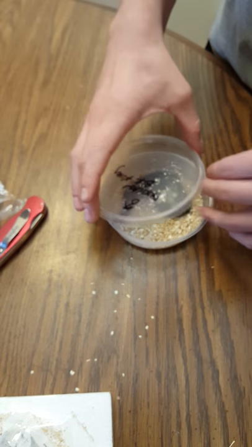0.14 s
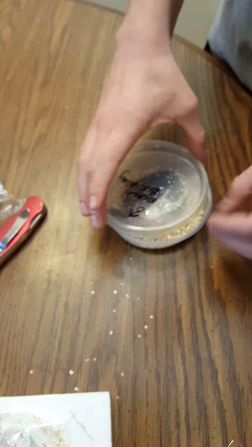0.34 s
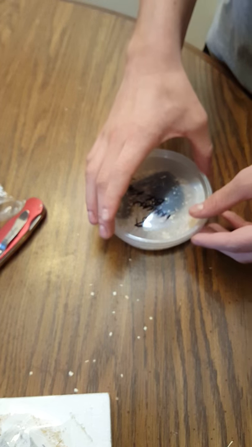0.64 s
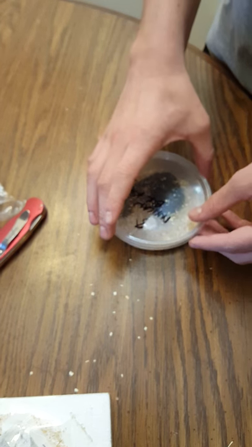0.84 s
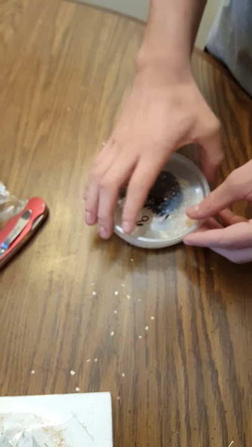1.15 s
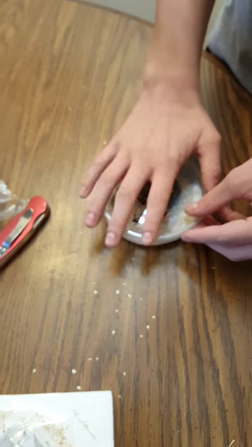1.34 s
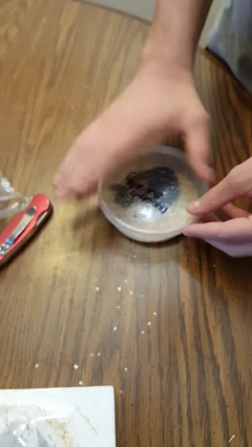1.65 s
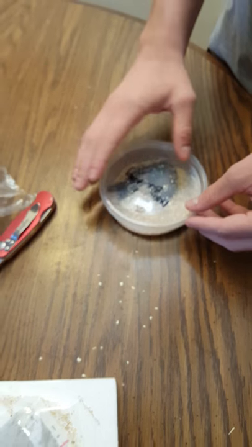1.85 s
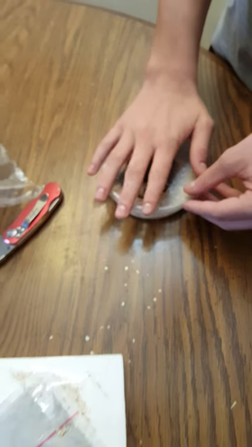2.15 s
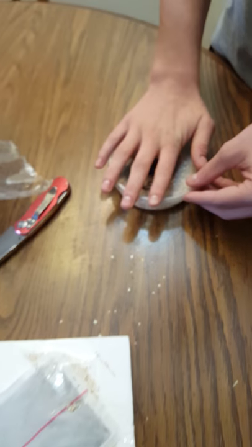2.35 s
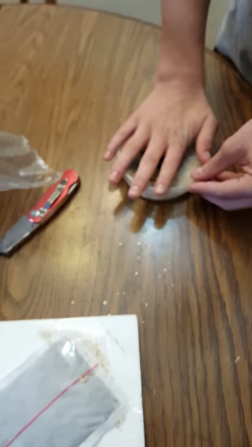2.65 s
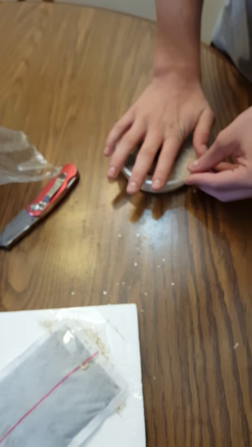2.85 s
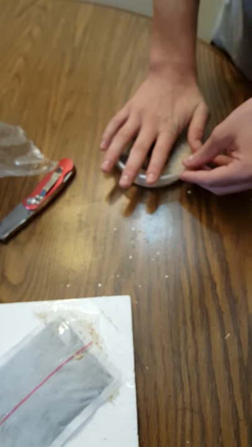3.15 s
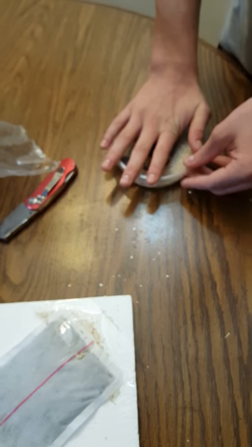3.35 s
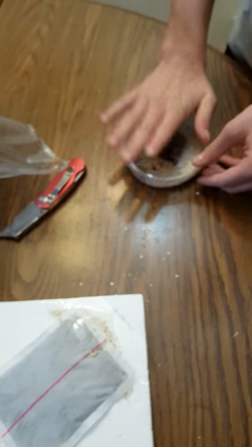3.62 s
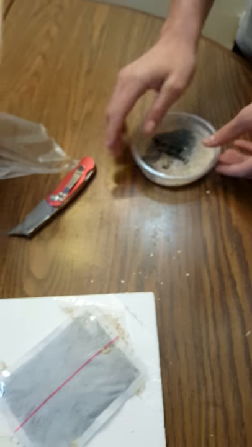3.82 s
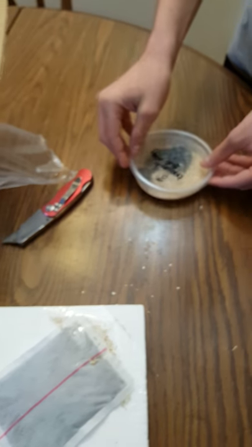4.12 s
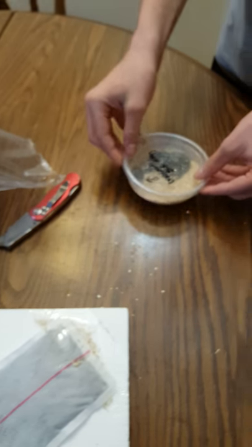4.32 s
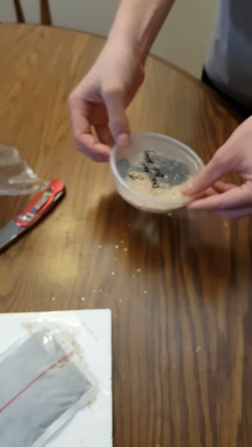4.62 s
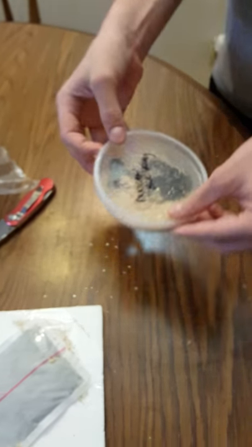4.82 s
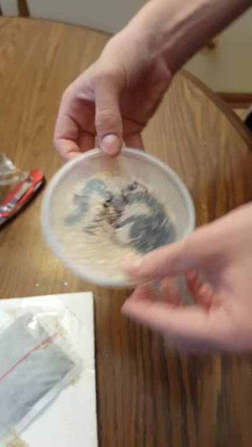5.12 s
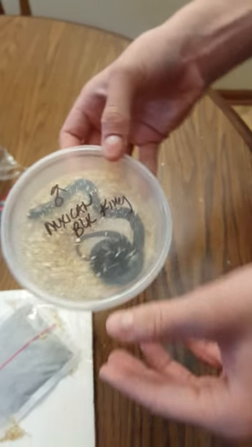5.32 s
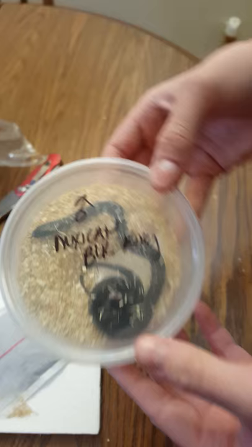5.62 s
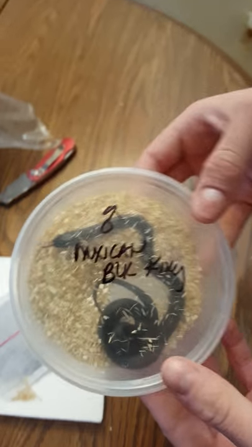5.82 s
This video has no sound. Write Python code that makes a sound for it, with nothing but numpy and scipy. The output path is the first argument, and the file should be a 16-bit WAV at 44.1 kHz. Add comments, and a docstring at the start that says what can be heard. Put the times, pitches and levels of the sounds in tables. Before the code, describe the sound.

A thin plastic lid skims softly onto a small plastic cup in the first moment. From about 0.9 seconds it is pressed down with light rubbing, scattered ticks and small pops, with a stronger cluster near 2.1 seconds. At 2.65 seconds comes the loudest sound, a sharp snap into the groove that thumps the wooden table and briefly rustles wood shavings inside. The rim zips shut with a second snap at 2.8 seconds, then gives a short rising creak around 3.2 seconds. Faint ticks follow until 3.6 seconds. Between 4.2 and 4.5 seconds the cup scrapes softly over the table with light taps. It is lifted, and at 5.2 seconds a firmer hollow finger knock jolts the shavings, followed by faint rubbing. Everything is heard close up in stereo, in a small room with a faint electrical hum.

```python
"""A thin plastic lid is pressed onto a deli cup: it skims into place, rubs, ticks and pops, snaps into
its groove, zips shut along the rim and creaks. Then the cup is slid, lifted and knocked by the fingers.
Wood shavings jump inside at the loudest snap and the hardest knock. Heard close up in stereo, the lid
facing the microphone, on a wooden table in a small room with a faint mains hum."""
import sys
import numpy as np
from scipy import signal
from scipy.fft import rfft, irfft, next_fast_len
from scipy.io import wavfile

SR = 44100
rng = np.random.default_rng(int(sys.argv[2]) if len(sys.argv) > 2 else 0)


def output_pcm(signal):
    """Save a mono or channel-first signal as 16-bit PCM at the path in sys.argv[1].

    Samples are clipped to [-1, 1] before scaling.
    """
    pcm = np.clip(np.atleast_2d(signal).T, -1, 1) * 32767
    wavfile.write(sys.argv[1], SR, np.round(pcm).astype(np.int16))


N = 263277
TIME = np.arange(N) / SR
SHORT = TIME[:SR // 2]

# Modes of the lid. Each row: frequency in Hz before tuning, relative level in dB, ring time factor.
LID_MODES = [(904, -0.5, 0.89), (1144, -21, 1.2), (1330, -34, 2.1), (1770, -12.5, 0.52), (2956, -20, 1.1),
             (3660, -20, 0.27)]
# Crack and hiss of thin plastic. Each row: frequency in Hz, relative level in dB.
PLASTIC_SPECTRUM = [(300, -7), (1000, -3), (1700, 5.5), (2400, 3.5), (3500, 3), (4400, 1.5), (5400, 0.5),
                    (7200, 0), (9200, 2), (11500, -4.5), (15500, -11)]


def amp(db):
    """Decibels to gain."""
    return 10 ** (np.asarray(db) / 20)


def unit_power(x):
    """Scale to an RMS of one."""
    return x / np.sqrt(np.mean(x ** 2) + 1e-20)


def at_hz(points, hz, column=1):
    """Read a table on a log-frequency axis."""
    points = np.array(points)
    return np.interp(np.log(hz + 1), np.log(points[:, 0]), points[:, column])


def add(out, s, sound):
    """Mix a sound in at s seconds."""
    start = round(s * SR)
    sound = sound[..., max(-start, 0):N - start]
    out[:, max(start, 0):max(start, 0) + sound.shape[-1]] += sound


def colour(x, spectrum):
    """Minimum-phase filter with the given spectrum and unit power gain."""
    size = 2 * next_fast_len(x.shape[-1])
    gain = unit_power(amp(at_hz(spectrum, np.arange(size // 2 + 1) * SR / size)))
    cepstrum = irfft(np.log(gain))
    cepstrum[1:size // 2] *= 2
    cepstrum[size // 2 + 1:] = 0
    return irfft(rfft(x, size) * np.exp(rfft(cepstrum)))[..., :x.shape[-1]]


def stereo(two, alike):
    """Two unrelated signals become left and right with the given correlation."""
    mid = np.sqrt(1 + alike) * two[0]
    side = np.sqrt(1 - alike) * two[1]
    return np.array([mid + side, mid - side]) / np.sqrt(2)


def pan(left_db):
    """Channel gains that put the left left_db above the right."""
    return amp(left_db * np.array([[.5], [-.5]]))


def diffuse(size):
    """Noise reaching the microphone from all sides: alike in both channels only in the lows."""
    # Each row: frequency in Hz, left-right correlation.
    likeness = [(60, 0.71), (200, 0.85), (500, 0.49), (1000, 0), (3000, 0), (15000, 0.095)]
    white = rfft(rng.standard_normal((2, size)))
    hz = np.arange(white.shape[1]) * SR / size
    return irfft(stereo(white, at_hz(likeness, hz)), size)


def ringing(modes, hz, ring_s):
    """A shell after one blow: each mode swells and dies; all are tuned so that the first lies at hz."""
    wave = 0
    for mode_hz, db, ring_factor in modes:
        age = SHORT / (ring_s * ring_factor)
        tuned_hz = mode_hz * hz / modes[0][0]
        wave -= amp(db) * age * np.exp(1 - age) * np.sin(2 * np.pi * tuned_hz * SHORT)
    return wave


def burst(spectrum, decay_s, alike):
    """One sudden slip: coloured noise that dies at once."""
    noise = stereo(rng.standard_normal((2, len(SHORT))), alike)
    return colour(noise * np.exp(-SHORT / decay_s), spectrum)


def grains(per_s, spread_db, size):
    """Two channels of tiny slips of uneven strength at random moments."""
    slipping = rng.random(size) < per_s / SR
    strength = slipping * amp(spread_db * np.minimum(rng.exponential(1, size), 3))
    return unit_power(strength * rng.standard_normal((2, size)))


def swell(length_s, rise_share, late_s=0):
    """One second of contact force, peaking late_s after the middle."""
    t = TIME[:SR] - .5 - late_s
    width_s = length_s * np.where(t < 0, rise_share, 1 - rise_share)
    return np.exp(-np.abs(t / width_s) ** 1.015)


def strokes(rows, rise_share):
    """Contact force of a run of swells; their powers add."""
    power = np.zeros((1, N))
    for peak_s, length_s, db in rows:
        add(power, peak_s - .5, (amp(db) * swell(length_s, rise_share)) ** 2)
    return np.sqrt(power)


def friction(force, spectrum, per_s, spread_db, alike):
    """Dry friction: a stream of tiny slips under a changing force."""
    return colour(stereo(grains(per_s, spread_db, size=N), alike) * force, spectrum)


def mic_balance(x):
    """The stereo microphone's colour and position tip each part of the spectrum slightly left or right."""
    # Each row: frequency in Hz, left minus right in dB.
    balance = [(250, -1.5), (500, -2.5), (720, 0.5), (1100, 0), (4500, -1.5), (8000, -1), (13000, 0.5)]
    size = 2 * next_fast_len(N // 2 + 2048)
    left_db = at_hz(balance, np.arange(size // 2 + 1) * SR / size)
    return irfft(rfft(x, size) * pan(left_db))[:, :N]


def room_tone(air_db=-64):
    """Air all around the microphone, and mains hum in the centre."""
    # Each row: frequency in Hz, relative level in dB.
    air_spectrum = [(25, -17), (60, -13.5), (85, -8), (125, -8), (190, -7.5), (350, -10.5), (580, -14.5),
                    (950, -14.5), (1400, -18), (2800, -21.5), (5500, -31.5), (10000, -34), (15800, -34)]
    # Each row: frequency in Hz, RMS level in dB.
    hum_tones = [(120, -73)]
    hum = sum(amp(db) * np.sqrt(2) * np.sin(2 * np.pi * hz * TIME) for hz, db in hum_tones)
    return amp(air_db) * unit_power(colour(diffuse(size=N), air_spectrum)) + hum


def room_echo(x, build_s=0.0017, near_db=11.0, near_s=0.0029):
    """Early echoes off table and hands, then the small room's diffuse tail."""
    # Each row: frequency in Hz, seconds to fall 60 dB, relative level in dB.
    decays = [(90.5, 0.61, -17.5), (344, 0.49, -1), (1010, 0.46, 0), (2520, 0.37, 2), (3900, 0.77, 0.5),
              (7850, 0.15, -5), (15000, 0.58, -6.5)]
    edges = np.geomspace(30, 16000, num=10)
    noise = diffuse(size=SR)
    t, tail = TIME[:SR], 0
    for low, high in zip(edges, edges[1:]):
        hz = np.sqrt(low * high)
        band = signal.sosfiltfilt(signal.butter(2, [low, high], "band", fs=SR, output="sos"), noise)
        tail += band * amp(at_hz(decays, hz, column=2) - 60 * t / at_hz(decays, hz))
    tail *= 1 - np.exp(-(t / build_s) ** 2)
    tail *= 1 + amp(near_db) * np.exp(-t / near_s)
    return signal.fftconvolve(x, unit_power(tail) / np.sqrt(SR), axes=1)[:, :N]


def table_thumps():
    """Snaps thump the table top through the cup; a softer push reaches only its low modes."""
    # Each row: frequency in Hz, relative level in dB, seconds to fall 60 dB.
    modes = [(42, -20.5, 1), (71.5, -18, 0.19), (108.4, -8, 0.32), (134, -4, 0.14), (199, -3.5, 0.097),
             (286, 4.5, 0.037), (357, -3, 0.064), (430.6, -6.5, 0.15), (715, -15, 0.038)]
    # Each row: start in seconds, gain in dB, low-pass edge in Hz.
    pushes = [(2.6526, -29, 890), (2.6660, -38, 260), (2.8247, -33.5, 137), (5.077, -44, 55)]
    out, top = np.zeros((2, N)), 0
    for k, (hz, db, t60) in enumerate(modes):
        top += (-1) ** k * amp(db - 60 * SHORT / t60) * np.sin(2 * np.pi * hz * SHORT)
    for s, db, edge_hz in pushes:
        add(out, s, amp(db) * signal.sosfilt(signal.butter(2, edge_hz, fs=SR, output="sos"), top))
    return out


def cup_slides():
    """The cup scrapes over the table and through the fingers."""
    # Each row: peak time in seconds, length in seconds, relative level in dB.
    slides = [(4.190, 0.12, -56), (4.266, 0.073, -47.5), (4.40, 0.096, -50.5), (4.458, .045, -49),
              (5.085, 0.17, -54.5), (5.5, 3.3, -66.5)]
    # Each row: frequency in Hz, relative level in dB.
    spectrum = [(100, -4), (200, 7), (400, 5.5), (700, 3.5), (1300, -1), (2100, -1), (3400, -6), (5000, -8),
                (9500, -10.5), (15500, -25)]
    return friction(strokes(slides, rise_share=0.33), spectrum, per_s=4000, spread_db=3.0, alike=0.7)


def shavings():
    """Wood shavings jump and rustle in the jolted cup."""
    # Each row: peak time in seconds, length in seconds, level in dB.
    jolts = [(2.668, 0.027, -37), (5.214, 0.046, -39.5)]
    # Each row: frequency in Hz, relative level in dB.
    spectrum = [(120, -10.5), (210, 2.5), (320, -11.5), (450, -1), (600, 5), (780, 0), (1100, -6.5),
                (1700, -10), (2500, -15.5), (4500, -20), (9000, -30.5), (15500, -44)]
    return friction(strokes(jolts, rise_share=0.22), spectrum, per_s=6000, spread_db=2.5, alike=0.82)


def cup_knocks(ring_cycles=0.58, rebound_cycles=2.9, loss_db=6.2, pitch_ratio=1.1, ring_ratio=1.7):
    """Fingers and table ring the hollow cup; each blow rebounds twice, weaker, higher and less damped."""
    # The filled cup. Each row: frequency in Hz before tuning, relative level in dB, ring time factor.
    modes = [(568, -0.5, 0.61), (237, -19, 3.1), (1022, -10, 1.9), (1430, -8, 0.39), (2270, -18, 1.3),
             (3220, -15.5, 0.42)]
    # Each row: start in seconds, level in dB, pitch in Hz.
    blows = [(4.2320, -39, 1940), (4.4040, -39.5, 230), (4.935, -43, 3500), (5.1984, -28, 548)]
    out = np.zeros((2, N))
    for s, db, hz in blows:
        for k in range(3):
            # A lower blow rebounds more slowly and rings longer.
            late_s = rebound_cycles / hz * k * (k + 1) / 2
            ring_s = ring_cycles / hz * ring_ratio ** k
            add(out, s + late_s, amp(db - loss_db * k) * ringing(modes, hz * pitch_ratio ** k, ring_s))
    return signal.sosfilt(signal.butter(2, 130, "high", fs=SR, output="sos"), out)


def lid_skim():
    """The loose lid skims into place, a little left of the microphone."""
    # Each row: time in seconds, relative contact force in dB.
    contact = [(0.0, -59), (0.062, -53.5), (0.09, -60), (0.102, -51.5), (0.13, -57.5), (0.166, -53),
               (0.174, -48), (0.205, -60)]
    # Each row: frequency in Hz, relative level in dB.
    spectrum = [(200, -19), (550, -11), (800, -0.5), (1150, 0.5), (1600, -2.5), (2200, -11.5), (4500, -13),
                (6000, -8), (7400, -6), (8700, 0), (10000, -10), (11500, -16.5), (15500, -26)]
    force = amp(1 + np.interp(TIME, *np.transpose(contact), right=-np.inf))
    return friction(force, spectrum, per_s=3800, spread_db=1.2, alike=0.44) * pan(left_db=2.5)


def rim_creak(jitter=0.04):
    """Stick and slip, quickening as the rim gives way."""
    # Each row: time in seconds, slips per second, relative level in dB.
    course = [(3.153, 123, -46.5), (3.168, 155, -47.5), (3.199, 175, -40), (3.219, 280, -41.5),
              (3.229, 410, -48)]
    times, rates, levels = np.transpose(course)
    out = np.zeros((2, N))
    s = times[0]
    # One slip. Each row: frequency in Hz, relative level in dB.
    spectrum = [(200, -6), (600, 6), (1100, 6), (2700, 0.5), (4200, -7.5), (6500, -10.5), (10000, -11),
                (15500, -17)]
    while s < times[-1]:
        add(out, s, amp(np.interp(s, times, levels)) * burst(spectrum, decay_s=0.00065, alike=0.21))
        s += np.exp(jitter * rng.standard_normal()) / np.interp(s, times, rates)
    return out


def lid_hz(s):
    """The lid tightens as it is stretched over the rim, and its pitch rises."""
    # Each row: time in seconds, lowest mode in Hz.
    pitches = [(1.5, 896), (2.15, 963), (2.83, 1008)]
    return np.interp(s, *np.transpose(pitches))


def rim_rubs(rise_share=0.46, settle_db=-19.5):
    """Dense slips of rim on rim hiss and ring the lid; after each rub the rim creeps a little further."""
    # Each row: peak time in seconds, length in seconds, body level in dB, hiss level in dB.
    rubs = [(0.918, 0.056, -58.5, -65), (0.989, 0.038, -49.5, -54.5), (1.15, 0.032, -53, -62.5),
            (1.28, 0.35, -65, -69.5), (1.505, 0.015, -53.5, -59.5), (1.602, 0.012, -53, -53.5),
            (1.876, 0.057, -61, -57.5), (2.05, 0.24, -70, -67), (2.149, 0.018, -43.5, -58),
            (2.256, 0.2, -68.5, -65.5), (2.658, 0.01, -38.5, -32.5), (2.823, 0.02, -48, -38),
            (2.8291, 0.0061, -28.5, -30.5), (3.62, 0.075, -67.5, -64.5), (4.01, 0.027, -67.5, -59),
            (5.154, 0.058, -74, -58.5), (5.751, 0.44, -91, -71)]
    out = np.zeros((2, N))
    settle = amp(settle_db) * swell(0.028, rise_share, late_s=0.044)
    for peak_s, length_s, body_db, hiss_db in rubs:
        slips = grains(per_s=6000, spread_db=0.5, size=SR)
        force = swell(length_s, rise_share) + settle
        ring = ringing(LID_MODES, lid_hz(peak_s), ring_s=0.00067)
        body = signal.fftconvolve(slips[0], ring)[:SR] * force
        body = unit_power(body) * np.sqrt(np.mean(force ** 2))
        hiss = colour(stereo(slips, alike=0.11) * force, PLASTIC_SPECTRUM)
        add(out, peak_s - .5, amp(body_db) * body + amp(hiss_db) * hiss)
    return out


def lid_pops(full_scale_ring_s=0.00046, ring_growth=0.19):
    """The lid buckles: a crack at the rim and a few cycles of drum-like modes, fewer if pushed harder."""
    # Each row: start in seconds, pop level in dB, crack level in dB before its low cut.
    pops = [(0.9100, -36.5, -48.5), (0.9750, -42.5, -59), (0.9926, -41, -56), (0.9995, -42, -74),
            (1.1915, -45, -66), (1.2528, -39.5, -58), (1.5005, -50, -72), (1.5287, -47, -48),
            (1.5880, -46, -52), (1.8254, -54, -72), (2.1415, -29, -44.5), (2.1458, -32, -45.5),
            (2.1543, -30, -59), (2.6517, -14, -30.5), (2.7784, -58, -32.5), (2.8252, -24.5, -31),
            (2.8275, -24, -32), (3.3965, -72, -51), (3.5242, -64, -51.5), (3.601, -57, -53),
            (3.6315, -46.5, -50.5), (5.0873, -56, -51.5)]
    out = np.zeros((2, N))
    for s, pop_db, crack_db in pops:
        crack = burst(PLASTIC_SPECTRUM, decay_s=0.0024, alike=0.25)
        # The less a crack moves the lid, the thinner it sounds.
        low_cut_hz = min(2180 * amp(crack_db - pop_db), 6500)
        crack = signal.lfilter(*signal.butter(1, low_cut_hz, "high", fs=SR), crack)
        ring_s = full_scale_ring_s * amp(-ring_growth * pop_db)
        add(out, s, amp(pop_db) * ringing(LID_MODES, lid_hz(s), ring_s) + amp(crack_db) * crack)
    return out


def scene():
    """The lid faces the microphone; the cup's sides and foot are heard more by way of the room."""
    skim = lid_skim()
    lid = lid_pops() + rim_rubs()
    foot = cup_slides()
    cup = cup_knocks() + shavings()
    rim = rim_creak()
    table = table_thumps()
    direct = skim + lid + amp(2.0) * rim + cup + amp(-1.5) * foot + table
    direct[0] = np.roll(direct[0], shift=-3)   # the cup is a little to the left: that side arrives first
    into_room = (amp(-10.0) * skim + amp(-10.5) * lid + amp(1.0) * rim
                 + amp(-6.0) * cup + amp(-8.5) * foot + amp(-4.5) * table)
    return mic_balance(direct + room_echo(into_room)) + room_tone()


def record(dry):
    """A steep cut above 15.9 kHz."""
    return signal.sosfilt(signal.ellip(10, .1, 70, 15900, fs=SR, output="sos"), dry)


dry = scene()
out = record(dry)
output_pcm(out)
```